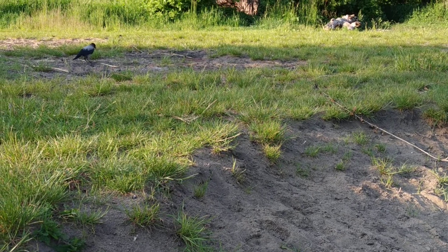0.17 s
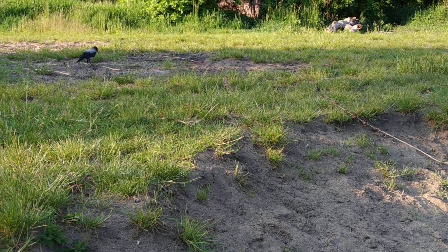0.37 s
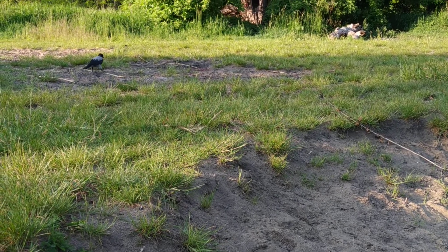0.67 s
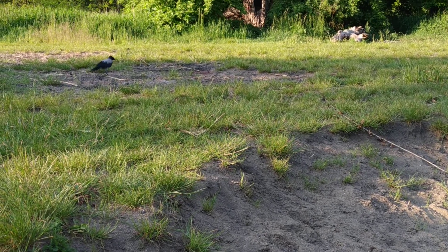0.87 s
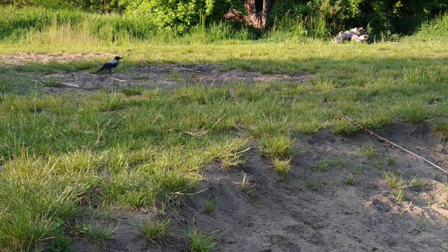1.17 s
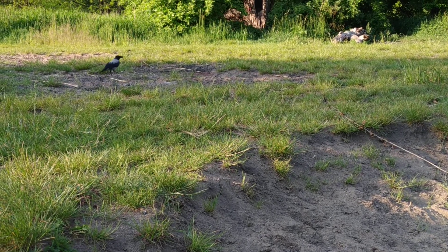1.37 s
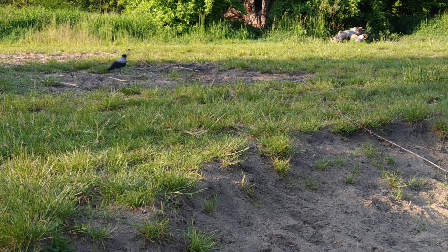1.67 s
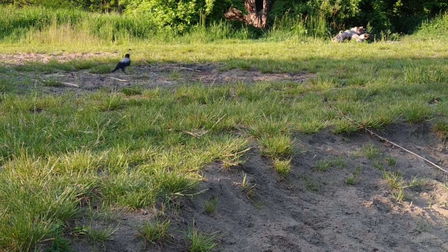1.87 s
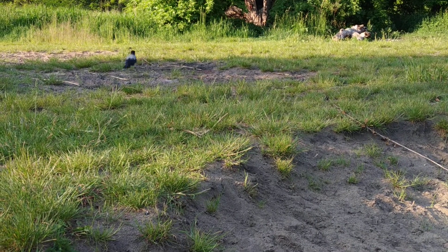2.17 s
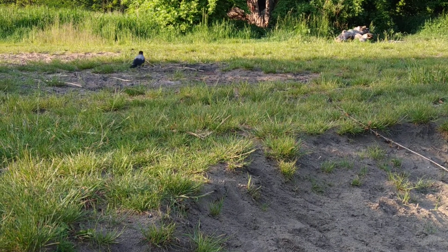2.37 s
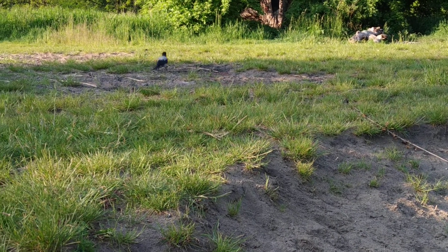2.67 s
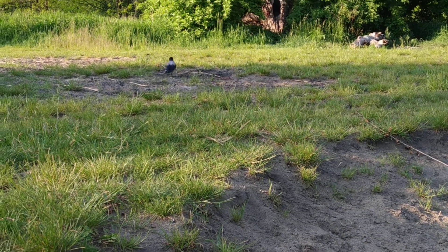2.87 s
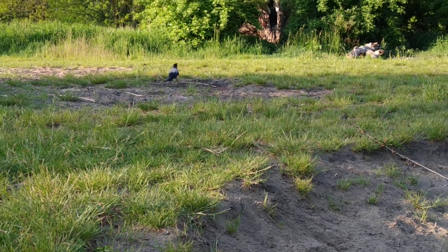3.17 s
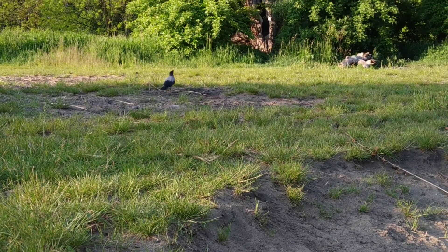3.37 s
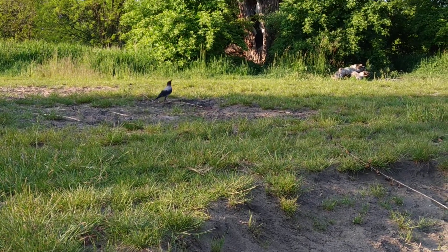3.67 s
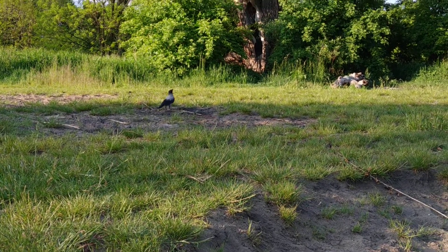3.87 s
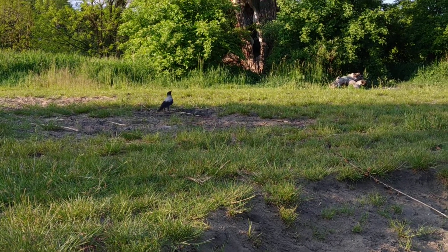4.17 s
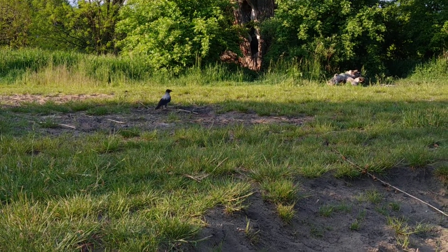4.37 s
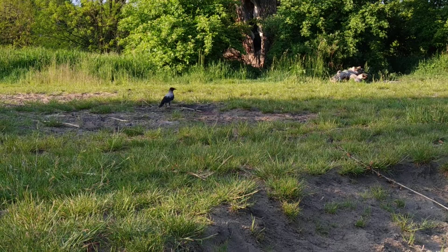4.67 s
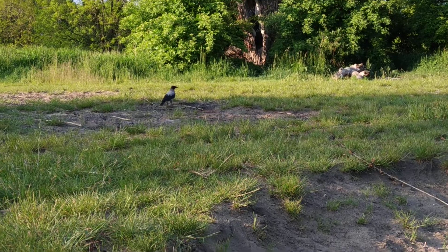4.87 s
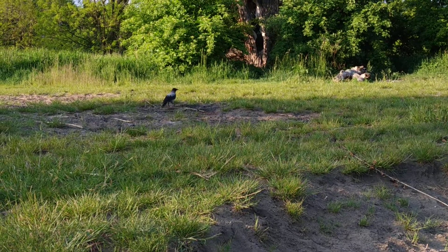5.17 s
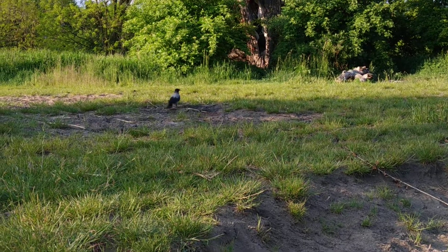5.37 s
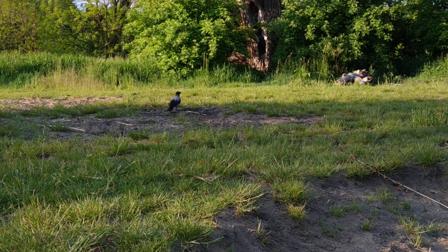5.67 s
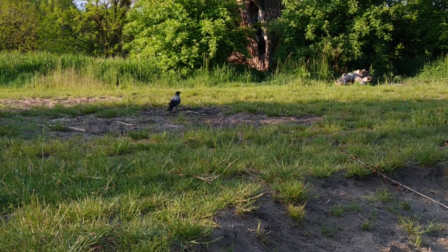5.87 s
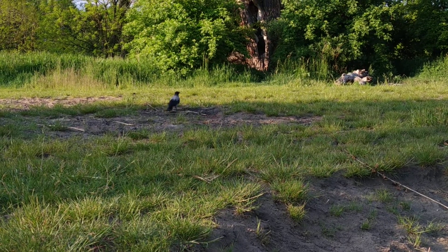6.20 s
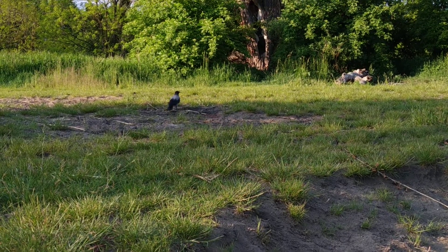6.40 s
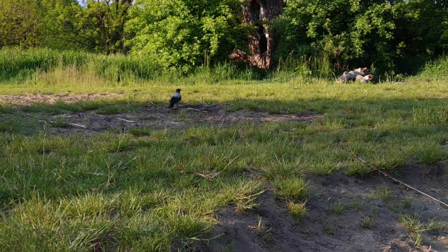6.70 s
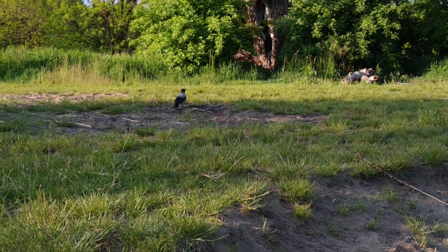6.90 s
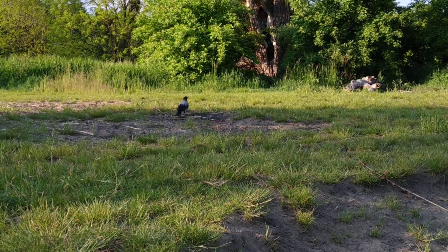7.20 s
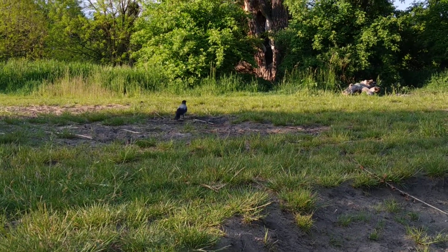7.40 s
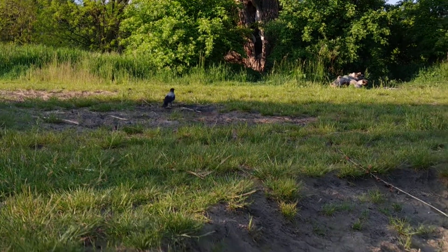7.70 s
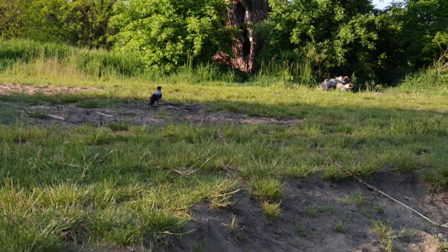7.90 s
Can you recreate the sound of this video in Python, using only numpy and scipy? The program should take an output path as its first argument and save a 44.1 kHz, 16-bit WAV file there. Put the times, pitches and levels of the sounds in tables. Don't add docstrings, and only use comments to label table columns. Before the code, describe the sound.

Quiet open air on a grassy river bank, with soft low rumble and faint hiss. Small birds whistle, chirp and trill, echoed by trees, a livelier warbler coming forward midway. A distant crow caws twice in the later part. The handheld stereo microphone picks up close plastic ticks and skin rubbing, with a sharp click near three seconds and the strongest scrapes and clicks toward the end.

```python
import sys
import numpy as np
from scipy import signal
from scipy.io import wavfile
from scipy.ndimage import uniform_filter1d

SR = 44100
rng = np.random.default_rng(int(sys.argv[2]) if len(sys.argv) > 2 else 0)


def invert_db(level):
    return 10 ** (np.asarray(level, dtype=float) / 20)


def file_out(sig):
    cols = np.atleast_2d(sig).T
    lim = np.clip(cols, -1, 1)
    pcm = np.round(lim * 32767).astype(np.int16)
    wavfile.write(sys.argv[1], SR, pcm)


N = 354740
SIDES = np.array([[.5], [-.5]])


def rms_one(x):
    return x / np.sqrt(np.mean(x ** 2) + 1e-20)


def columns(rows, t):
    s, *rest = np.transpose(rows)
    return np.array([np.interp(t, s, c) for c in rest])


def at_hz(points, hz):
    points = np.array(points)
    return np.interp(np.log(hz), np.log(points[:, 0]), points[:, 1])


def drift(rate, count):
    points = rng.standard_normal(int(count * rate // SR) + 2)
    return np.interp(np.arange(count) * rate / SR, np.arange(len(points)), points)


def band(x, low_hz, high_hz):
    sos = signal.butter(2, [low_hz, min(high_hz, .45 * SR)], "band", fs=SR, output="sos")
    return signal.sosfilt(sos, x)


def ring(t, hz, t60):
    return np.sin(2 * np.pi * hz * t) * invert_db(-60 * t / t60)


def add(out, s, x):
    i = round(s * SR)
    out[..., i:i + x.shape[-1]] += x[..., :N - i]


# frequency in Hz, level in dB per Hz.
AIR_SPECTRUM = [(40, -10), (90, -60), (170, 1.5), (225, 0.5), (400, -9.5), (800, -11.5), (1300, -13.5),
                (2300, -16), (4200, -16.5), (7200, -20), (13000, -21), (16000, -22.5)]
# frequency in Hz, likeness from -1 to 1.
AIR_LIKENESS = [(60, 0.74), (150, 1), (380, 0.5), (950, -0.37), (2380, -0.063), (5980, -0.01),
                (15000, -0.025)]


def air():
    level_db, balance_db = -53.5, 0.34
    out, edges = 0, 30 * 2 ** np.arange(0, 9.6, .5)
    white = rng.standard_normal((2, 2, N))
    for k, (low, high) in enumerate(zip(edges, edges[1:])):
        mid, side = band(white[k % 2], low, high)
        hz = np.sqrt(low * high)
        alike = np.clip(at_hz(AIR_LIKENESS, hz), -1, 1)
        gain = invert_db(at_hz(AIR_SPECTRUM, hz) + 0.23 * drift(9.8, N))
        out = out + gain * (np.sqrt(1 + alike) * mid + np.sqrt(1 - alike) * side * [[1], [-1]])
    return rms_one(out) * invert_db(level_db + balance_db * SIDES)


def whistle(hz, rms_db, pan_db, lag, edge_s):
    t = np.arange(len(hz)) / SR
    wavering_hz = hz * (1 + .011 * drift(132.4, len(hz)))
    phase = 2 * np.pi * (np.cumsum(wavering_hz) - hz * [[lag], [0]]) / SR
    edge = np.sin(np.pi / 2 * np.clip(np.minimum(t, t[-1] - t) / edge_s, 0, 1))
    level = invert_db(rms_db + pan_db * SIDES + 3 * drift(90, len(hz)))
    return np.sqrt(2) * level * edge * np.sin(phase)


def sing(notes, bend, bearing):
    swell_db = 6
    out = np.zeros((2, N))
    for start, length, first_hz, last_hz, db in notes:
        share = np.arange(0, 1, 1 / (SR * length))
        slid = share ** bend if bend >= 1 else 1 - (1 - share) ** (1 / bend)
        hz = first_hz + (last_hz - first_hz) * slid
        pan_db, lag = bearing(start)
        note = whistle(hz, db - swell_db * (2 * share - 1) ** 2, pan_db, lag, edge_s=.005)
        add(out, max(start, 0), note)
    return out


# start in seconds, length in seconds, first pitch in Hz, last pitch in Hz, peak level in dB.
THRUSH_NOTES = [(-.01, 0.046, 2040, 1890, -55.5), (.42, 0.063, 1750, 1630, -55.5),
                (.52, .1, 1580, 1490, -66), (.5, 0.11, 1990, 2000, -61), (0.699, 0.13, 2240, 1830, -54.5),
                (0.799, 0.15, 1763, 1670, -55), (1.001, 0.087, 3150, 2400, -64.5),
                (1.96, 0.11, 2295, 2290, -70), (5.12, 0.16, 1720, 1950, -67), (5.26, 0.15, 1970, 1675, -62),
                (5.455, 0.062, 2550, 2550, -59), (5.563, 0.044, 2400, 2050, -58),
                (6.54, 0.196, 2320, 2386, -60)]


def thrush():
    return sing(THRUSH_NOTES, 1, lambda s: (7.5, -13.5))


# start in seconds, length in seconds, first pitch in Hz, last pitch in Hz, peak level in dB.
WARBLER_SLIDES = [(5.213, 0.027, 4300, 3600, -45.5), (.11, 0.037, 3240, 2980, -63),
                  (.68, .06, 3690, 3810, -64), (1.08, 0.044, 4740, 4480, -63),
                  (1.665, 0.048, 4050, 3520, -59), (1.9, .03, 2960, 2880, -64),
                  (2.325, 0.039, 4500, 4120, -61), (2.403, .022, 4000, 3550, -58),
                  (2.755, 0.035, 3530, 3370, -53.5), (2.95, .11, 2630, 2960, -56.5),
                  (3.175, 0.039, 4600, 3500, -54), (3.31, 0.059, 4480, 4450, -58),
                  (3.37, .05, 4260, 4260, -64), (3.8, .05, 3150, 3260, -59),
                  (3.87, 0.063, 2610, 2555, -57.5), (4.355, 0.043, 3440, 3200, -54),
                  (4.405, 0.047, 3080, 3087, -53), (5.995, 0.034, 4350, 4400, -56),
                  (6.122, 0.057, 3210, 2960, -52), (6.262, 0.047, 2710, 2690, -55),
                  (6.35, 0.027, 3140, 3130, -58), (6.525, 0.032, 3320, 3170, -51),
                  (6.555, .032, 3550, 3160, -52), (6.66, 0.042, 2850, 2650, -55)]
WARBLER_SCOOPS = [
    (3.62, 0.12, 2250, 3160, -59.5),
    (4.15, 0.085, 2230, 2680, -54.5),
    (5.497, 0.097, 4500, 3240, -50.5),
    (6.398, 0.056, 4270, 3916, -44),
]
WARBLER_HOOKS = [
    (4.975, 0.13, 2960, 3220, -51),
    (5.2, .02, 4400, 4350, -52),
    (4.585, .075, 2890, 2530, -49.5),
    (4.785, 0.081, 4070, 3520, -47),
    (5.32, 0.07, 4440, 3700, -53.5),
    (5.7, 0.055, 3020, 2740, -48.5),
    (5.85, .055, 3270, 3150, -49.5),
    (5.895, 0.031, 3480, 4080, -48.5),
]
# time in seconds, left minus right in dB, left lag in samples.
WARBLER_BEARING = [
    (0, 5, -20),
    (4.7, -1, -21),
    (4.76, 2, -13.5),
    (6.3, 2, -10.5),
    (6.7, 2, -11),
]


def warbler():
    out = np.zeros((2, N))
    for notes, bend in (WARBLER_SLIDES, 1), (WARBLER_SCOOPS, .36), (WARBLER_HOOKS, 2.9):
        out += sing(notes, bend, lambda s: columns(WARBLER_BEARING, s))
    return out


# start in seconds, end in seconds, pitch in Hz, drops per second, level in dB.
FAR_TRILLS = [
    (0.149, 0.315, 2920, 37, -62.5),
    (.33, 0.42, 2780, 25, -66.5),
    (1.079, 1.368, 2553, 30, -65),
    (1.169, 1.32, 2150, 29, -67),
    (1.71, 1.79, 3600, 26, -71),
    (6.138, 6.193, 3040, 45.7, -60),
    (4.72, 4.782, 4530, 55, -61),
    (7.872, 8.04, 2540, 28, -66.5),
]


def trills():
    out = np.zeros((2, N))
    for start, end, hz, per_s, db in FAR_TRILLS * 2:
        turn = np.arange(0, end - start, 1 / SR) * per_s % 1
        wander = 1 + .03 * drift(per_s, len(turn))
        falling_hz = hz * wander * (1.09 - 0.23 * turn)
        tone = whistle(falling_hz, db + 3 * drift(per_s, len(turn)), 6, 7.9, edge_s=0.017)
        add(out, start, tone * np.sin(np.pi * turn) ** 2)
    return out


def trees(x):
    t60_s, level_db = .4, -6.5
    t = np.arange(int(.6 * SR)) / SR
    tail = rng.standard_normal((2, len(t))) * invert_db(-60 * t / t60_s) * np.clip(t / 0.0018, 0, 1)
    tail = tail / np.sqrt(np.sum(tail ** 2, axis=1, keepdims=True))
    return invert_db(level_db) * signal.fftconvolve(x, tail, axes=1)[:, :N]


# time in seconds, pitch in Hz, t60 in seconds, left level in dB, right level in dB.
CASING_BUMPS = [
    (.362, 198, 0.062, -31, -61),
    (.66, 139, 0.042, -59, -30.5),
    (3.1245, 900, 0.0025, -16.5, -46),
    (3.1265, 384, 0.014, -22, -23.5),
    (6.842, 586, 0.014, -40, -31),
    (7.926, 460, 0.0045, -57, -25),
    (8.037, 413, 0.041, -38, -50),
]


def bumps():
    out, t = np.zeros((2, N)), np.arange(int(.08 * SR)) / SR
    for s, hz, t60, *levels_db in CASING_BUMPS:
        add(out, s, invert_db(levels_db)[:, None] * ring(t, hz, t60))
    return out


# start in seconds, top pitch in Hz, held pitch in Hz, last pitch in Hz, level in dB.
CHIP_CALLS = [
    (1.0, 4400, 3650, 3680, -65),
    (1.33, 6600, 4440, 4700, -63),
    (1.683, 7020, 3740, 5160, -58),
    (2.012, 6760, 4490, 4700, -64.5),
    (2.705, 5650, 4520, 4750, -64.5),
]


def chips():
    out = np.zeros((2, N))
    turns = np.cumsum([0, 0.019, .05, .018])   # drop, hold and turn in seconds
    t = np.arange(0, turns[-1], 1 / SR)
    shape_db = np.interp(t, turns, [1, 0, 0, -6])
    for start, top_hz, held_hz, last_hz, db in CHIP_CALLS:
        hz = np.interp(t, turns, [top_hz, held_hz, held_hz, last_hz])
        hz = uniform_filter1d(hz, size=200)
        add(out, start - .003, whistle(hz, db + shape_db, -8, 19, edge_s=0.0044))
    return out


# start in seconds, length in seconds, first pitch in Hz, last pitch in Hz, peak level in dB.
SEEP_CALLS = [
    (1.772, .015, 4700, 4100, -60),
    (1.485, .025, 5880, 4800, -65),
    (5.535, .03, 5700, 5800, -62),
    (5.785, .05, 6500, 5500, -61.5),
    (6.425, 0.018, 6330, 4300, -60),
]


def seeps():
    return sing(SEEP_CALLS, 2.9, lambda s: (2, 14.6))


# start in seconds, hardest moment in seconds, end in seconds, hiss in dB, scrape in dB.
LEFT_STROKES = [(2.07, 2.23, 2.42, -48.5, -56.5), (2.645, 2.69, 2.73, -46, -75),
                (3.09, 3.14, 3.195, -52, -49), (4.17, 4.23, 4.31, -58, -58.5),
                (4.56, 4.665, 4.73, -45, -51.5), (4.877, 4.898, 4.935, -33.5, -44.5),
                (6.615, 6.64, 6.67, -52, -52), (6.795, 6.815, 6.86, -42, -43),
                (6.838, 6.857, 6.867, -25.5, -39.5), (6.865, 6.89, 6.95, -38, -43.5),
                (6.92, 6.97, 7.01, -39.5, -42), (6.995, 7.012, 7.025, -30.5, -39.5),
                (7.02, 7.08, 7.14, -48, -52), (7.12, 7.19, 7.21, -42, -52), (7.2, 7.235, 7.26, -17.5, -28),
                (7.235, 7.26, 7.288, -10.5, -25), (7.28, 7.31, 7.37, -25.5, -34.5),
                (7.33, 7.37, 7.42, -37, -47.5), (7.6, 7.7, 7.74, -46, -51.5),
                (7.7, 7.755, 7.78, -33, -36.5), (7.745, 7.79, 7.81, -26, -33)]
RIGHT_STROKES = [
    (3.09, 3.105, 3.15, -45, -42),
    (3.13, 3.175, 3.2, -49, -43),
    (3.415, 3.435, 3.468, -70, -49.5),
    (4.16, 4.22, 4.31, -59, -56),
    (4.56, 4.67, 4.705, -69, -51.5),
    (4.87, 4.895, 4.94, -63, -45),
    (6.78, 6.84, 7.2, -73, -47),
    (7.6, 7.69, 7.79, -59, -51),
    (7.74, 7.805, 7.815, -67, -40.5),
]


def rubbing(strokes, body_rel_db):
    out = np.zeros(N)
    for start, hardest, end, hiss_db, scrape_db in strokes:
        t = np.arange(start, end, 1 / SR)
        ease_db = 13.5 * np.interp(t, [start, hardest, end], [1, 0, 1]) ** 2
        hiss_db = hiss_db - ease_db
        scrape_db = scrape_db - ease_db
        body_db = scrape_db + body_rel_db + 0.26 * (scrape_db + 46)
        flicker_db = 2.5 * drift(1500, len(t)) + .7 * drift(200, len(t))
        grains = rng.standard_normal((4, len(t))) * invert_db(flicker_db)
        hard = np.clip((hiss_db + 31.5) / 22, .15, .96)
        light_hiss = rms_one(band(grains[0], 11300, 16500))
        hard_hiss = rms_one(band(grains[1], 7100, 13000))
        hiss = np.sqrt(1 - hard) * light_hiss + np.sqrt(hard) * hard_hiss
        scrape = rms_one(band(grains[2], 1250, 6300))
        body = rms_one(band(grains[3], 237, 880))
        add(out, start, invert_db(hiss_db) * hiss + invert_db(scrape_db) * scrape + invert_db(body_db) * body)
    return out


# time in seconds, left dull level in dB, left bright level in dB,
# right dull level in dB, right bright level in dB.
CASING_TICKS = [(2.572, -48, -23, -43, -43), (2.8235, -52, -28, -50, -37), (3.1208, -15, -7, -41, -38),
                (4.6, -45, -50, -34, -52), (4.686, -47, -36, -46, -38), (6.495, -40, -41, -34.5, -13.5),
                (6.7528, -48, -35, -14, -44), (6.83, -18, -13, -40, -45), (6.842, -40, -33, -15, -38),
                (6.876, -38, -40, -19, -36), (7.504, -52, -55, -39, -55), (7.783, -40, -40, -32, -48),
                (7.928, -51, -39, -39, -28), (7.9734, -22, -3, -35, -45)]
# frequency in Hz, level in dB, t60 in seconds.
DULL_MODES = [(1670, -16.5, 0.0055), (3520, -1, 0.0011), (4350, -18, 0.0069)]
BRIGHT_MODES = [(6200, 3.5, 0.0017), (8400, -1, 0.0035), (9500, -3, 0.00052), (11000, 5, 0.0017),
                (14000, 11, 0.00065)]


def strike(modes, t):
    blow = 0
    for hz, db, t60 in modes:
        blow = blow + invert_db(db + rng.normal(0, 1.3)) * rng.choice([-1, 1]) * ring(t, hz, t60)
    return blow / abs(blow).max()


def ticks():
    out, t = np.zeros((2, N)), np.arange(int(.08 * SR)) / SR
    for s, *levels_db in CASING_TICKS:
        blows = [strike(DULL_MODES, t), strike(BRIGHT_MODES, t)]
        add(out, s - .0003, invert_db(np.reshape(levels_db, (2, 2))) @ blows)
    return out


# start in seconds, level in dB.
CROW_CAWS = [
    (5.583, -50),
    (6.76, -49.5),
]
BILL_CLOSES_S = [.26, .40]


def crow():
    out, length_s = np.zeros((2, N)), .52
    t = np.arange(0, length_s, 1 / SR)
    edge_db = -20 * (1 - np.clip(np.minimum(t, length_s - t) / .02, 0, 1))
    pitch_hz = np.interp(t, BILL_CLOSES_S, [356, 311])
    throat_hz = np.interp(t, BILL_CLOSES_S, [1930, 1600])
    width_hz = np.interp(t, BILL_CLOSES_S, [340, 235])
    throbs_per_s = np.interp(t, BILL_CLOSES_S, [45, 35])
    depth = np.interp(t, BILL_CLOSES_S, [.3, .95])
    wobble = np.interp(t, BILL_CLOSES_S, [.04, .022])
    beat = 2 * np.pi * np.cumsum(throbs_per_s) / SR + 1.2
    hz = pitch_hz * (1 - wobble * np.cos(beat))
    for start, level_db in CROW_CAWS:
        phase = 2 * np.pi * np.cumsum(hz * (1 + .01 * drift(250, len(t)))) / SR
        voice = 0
        for half in range(5, 15):
            off = (half / 2 * hz - throat_hz) / width_hz
            shape_db = np.maximum(-5 * np.log1p(off ** 4), -13) - 9 * (half % 2)
            throb = 1 + depth * np.sin(beat) * np.clip(1 - off, .2, 1)
            voice = voice + invert_db(shape_db + 2 * drift(200, len(t))) * throb * np.sin(half / 2 * phase)
        voice = band(voice, 1420, 2300)
        breath = rng.standard_normal(len(t)) * (1 + np.cos(phase))
        rasp = band(band(breath, 1450, 2250), 1450, 2250)
        voice = rms_one(voice) + .42 * rms_one(rasp)
        both = rms_one(np.array([voice, np.roll(voice, shift=22)]))
        caw = both * invert_db(edge_db + level_db + 3 * SIDES)
        add(out, start, caw)
        add(out, start + .11, invert_db(-9) * band(caw, 1330, 2080))
    return out


def scene():
    near = thrush() + warbler() + chips() + seeps()
    far, caws = trills(), crow()
    echoes = trees(near + 2.4 * far + 1.2 * caws)
    skin = np.array([rubbing(LEFT_STROKES, -9), rubbing(RIGHT_STROKES, -10.5)])
    casing_cut = signal.butter(2, 147, "high", fs=SR, output="sos")
    casing = signal.sosfilt(casing_cut, bumps() + ticks())
    return air() + near + far + caws + echoes + skin + casing


def band_limit(x):
    return signal.sosfilt(signal.butter(12, 17060, fs=SR, output="sos"), x)


def record(dry):
    x = signal.sosfilt(signal.butter(2, 110, "high", fs=SR, output="sos"), dry)
    x = .95 * np.tanh(x / .95)
    x = signal.sosfilt(signal.cheby2(14, 45, 16100, fs=SR, output="sos"), x)
    return band_limit(x)


dry = scene()
out = record(dry)
file_out(out)
```